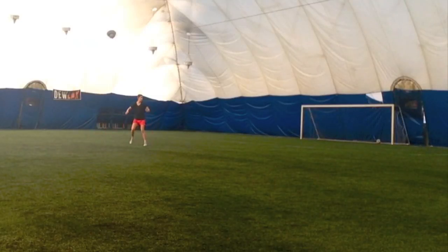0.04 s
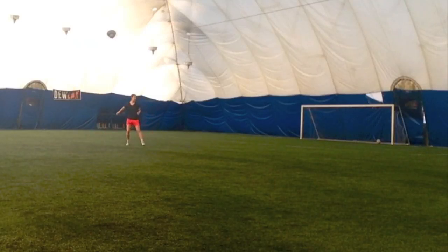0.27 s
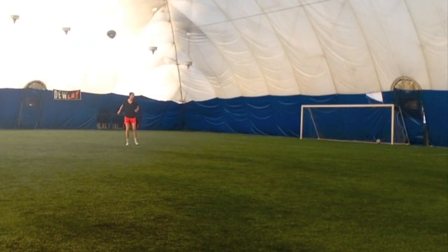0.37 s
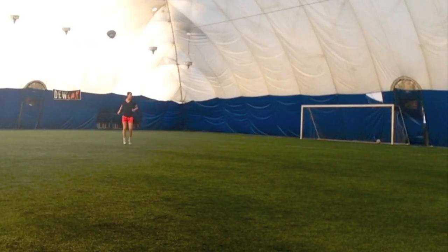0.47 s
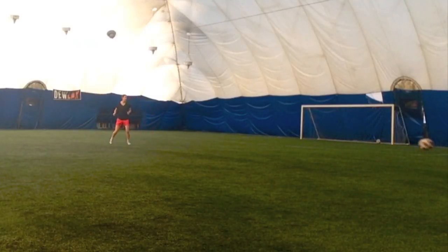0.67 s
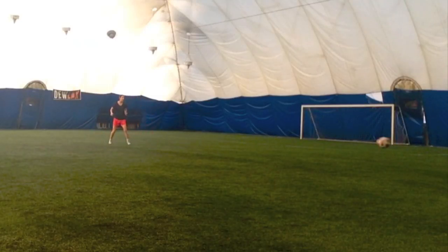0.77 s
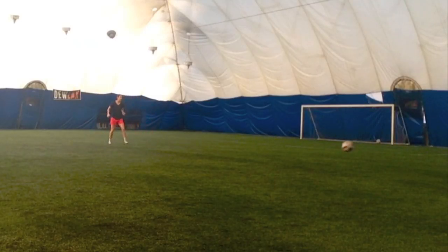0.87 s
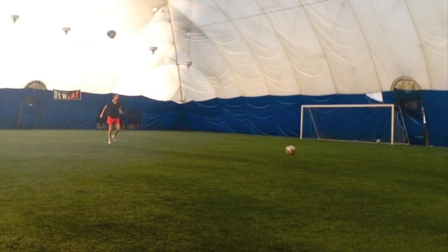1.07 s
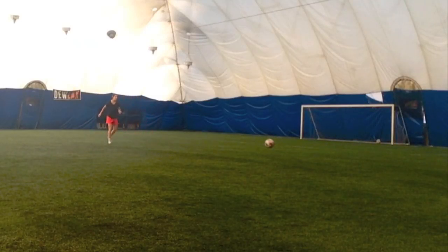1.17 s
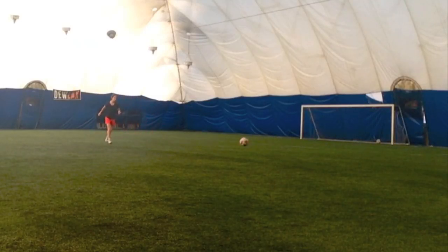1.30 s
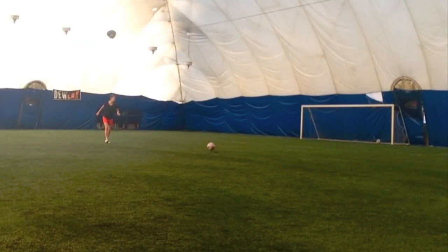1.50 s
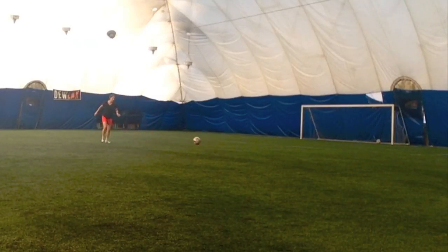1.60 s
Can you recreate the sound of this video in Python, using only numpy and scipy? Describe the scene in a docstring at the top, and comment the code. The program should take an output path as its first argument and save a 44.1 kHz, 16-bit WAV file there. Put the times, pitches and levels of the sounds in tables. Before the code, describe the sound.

Faint fan hum in a large indoor turf hall, then a sudden loud, cracking boot-on-ball thump nearby, answered a fifth of a second later by a muffled, booming echo that fades into the hum.

```python
"""Inside an air-supported sports dome, a football is kicked hard close by while blowers rumble and whine.
The boot's slap is a filtered click plus a noise burst; the thump and ping are dying cosine waves.
Turf scatter and crisp reflections follow, then roof echoes, strongest about a fifth of a second later:
copies of thump and ping, each with a dull noise burst. Fading noise makes the hall's tail, a sine with
rising pitch makes a low boom, and a swell of noise makes a late return from the far end."""
import sys
import numpy as np
from scipy import signal
from scipy.fft import rfft, irfft
from scipy.io import wavfile

SR = 44100
rng = np.random.default_rng(int(sys.argv[2]) if len(sys.argv) > 2 else 0)


def to_wav(sig):
    """Store sig (one row per channel, or 1-D mono) as 16-bit WAV at the path in sys.argv[1].

    Samples outside -1..1 are clipped; the rate is SR.
    """
    pcm = np.clip(np.atleast_2d(sig), -1, 1) * 32767
    pcm = np.round(pcm).astype(np.int16)
    wavfile.write(sys.argv[1], SR, pcm.T)  # frames by channels


N = 72765
TIME = np.arange(N) / SR   # seconds

# Rush of air from the blowers, relative colour: (f/Hz, level/dB per Hz)
BLOWER_COLOUR = [(15, -49), (25, -12), (122, -0.5), (156, -6.5), (173, -12), (274, -9.5), (322, -8.5),
                 (349, -12.5), (378, -10.5), (410, -21), (495, -18), (684, -8), (970, -19.5), (2010, -24.5),
                 (2170, -27), (2490, -28.5), (6920, -33.5), (10400, -31.5), (15500, -38)]
# Steady blower tones: (f/Hz, rms level/dB)
BLOWER_TONES = [(118.4, -68.5), (355.3, -66.5), (672.9, -75.5), (2115.7, -67)]
# Slap of the ball's skin, also used for the turf, relative colour: (f/Hz, level/dB per Hz)
SLAP_COLOUR = [(200, -28), (500, -5), (1000, -30), (2000, 0.5), (2700, 1), (4000, 3), (6500, 3.5),
               (11500, 4), (12600, -6), (13700, 3.5), (16000, -18)]
# Thump of the ball, before the push smooths it: (f/Hz, level/dB, time to fall 60 dB: t60/s)
THUMP_MODES = [(120, -9.5, 0.046), (161.7, -16, 0.065), (255, -23, 0.071), (358, -26, 0.088)]
# Ping of the ball's air and skin: (f/Hz, level/dB, t60/s)
PING_MODES = [(455.4, -37.5, 0.054), (652, -35.5, 0.092), (796, -39, 0.082), (900, -51, 0.36),
              (966, -43, .12), (1147, -42, 0.14), (1306, -34.5, 0.077), (1600, -37.5, 0.11),
              (1960, -38.5, 0.12), (2302, -40, 0.094), (3025, -67, 0.23), (3470, -35, 0.078),
              (3650, -29, 0.046), (4030, -34, 0.045)]
# Reverberation of the dome, one octave-wide band a row: (f/Hz, starting level/dB, t60/s)
HALL_BANDS = [(61.4, -47, 0.61), (116, -48, 1.4), (251, -51.5, 0.88), (510, -60, 3.9), (1000, -54.5, 2.8),
              (2000, -50.5, 0.74), (3970, -60.5, 1.15), (8400, -57, 0.81)]
# Crisp reflections of the smack from things nearby: (t/s, level/dB against the smack)
NEAR_REFLECTIONS = [(0.2616, -18.5), (.285, -24.5), (0.316, -37), (0.331, -36)]
# Echoes from the roof:
# (t/s, thump level/dB against the kick, scatter level/dB, scatter t60/s, scatter cut-off f/Hz)
ROOF_ECHOES = [(0.3434, -27.5, -56, .1, 2500), (0.416, -26, -46, 0.3, 6010), (0.427, -25, -48, 0.16, 5900),
               (0.4407, -19, -30, 0.071, 6500), (.4490, -17.5, -37.5, 0.18, 2000),
               (.4700, -34, -36, 0.089, 4900), (0.477, -18.5, -37.5, 0.2, 3054),
               (.4890, -22.5, -40, 0.089, 8770), (0.513, -34.5, -51, 0.39, 1600),
               (0.5368, -20, -43, 0.29, 900), (0.603, -37, -52, 0.26, 1240)]
# Scatter from the roof, relative colour before each echo's cut-off: (f/Hz, level/dB per Hz)
SCATTER_COLOUR = [(120, -25), (260, -8), (410, -3), (530, -9.5), (800, -8), (1500, -14), (2500, -19.5),
                  (5000, -30), (10000, -26.5), (16000, -18)]
# Late, smeared return from the far end, relative colour: (f/Hz, level/dB per Hz)
FAR_COLOUR = [(70, -10), (155, -4), (260, -14), (450, -6), (850, -1), (1400, -19), (3000, -42)]

BLOWERS_DB = -53
TONE_WAVER_DB, TONE_WAVER_HZ = 0.6, 5   # rms size and top speed of the waver
KICK_S = 0.2427
CRACK_DB, CRACK_LOW_HZ, CRACK_HIGH_HZ = 8.5, 1190, 7400   # click height before its filters
SLAP_DB, SLAP_T60_S = -17.5, 0.035
CONTACT_S = 0.0022   # length of the push that sets the ball thumping
THUMP_LOW_CUT_HZ = 73   # low cut of the microphone, which thins the thump's deepest bass
TURF_DB, TURF_T60_S = -34.5, 0.15
HALL_BUILD_S = 0.016
ECHO_RISE_S, ECHO_THUMP_CUT_HZ = 0.0019, 214
ECHO_PING_DB, ECHO_PING_CUT_HZ = 29.5, 770   # ping gain on top of each echo's scatter level
BOOM_S, BOOM_LENGTH_S, BOOM_DB = 0.62, 0.09, -47   # centre, centre to 1/e of the peak, level
BOOM_HZ, BOOM_RISE_HZ_PER_S = 141, 289.3   # pitch at the centre and how fast it climbs
BOOM_WAVER_DB, BOOM_WAVER_HZ, BOOM_WAVER_RAD = 3.5, 24.7, 0.5
FAR_S, FAR_WIDTH_S, FAR_DB = 0.686, 0.1, -51.5   # centre, centre to 1/e of the peak, level
CUTOFF_HZ = 15600


def from_db(db):
    """Turn decibels into a gain."""
    return 10 ** (np.asarray(db) / 20)


def rms_one(x):
    """Scale a sound to an rms (average strength) of 1."""
    return x / np.sqrt(np.mean(x ** 2) + 1e-20)


def filtered(x, hz, kind, order=2):
    """Keep only the low, high or band part of a sound, with a Butterworth filter."""
    sos = signal.butter(order, np.clip(hz, 2, 0.45 * SR), kind, fs=SR, output="sos")
    return signal.sosfilt(sos, x + 1e-18)


def noise(colour):
    """Random hiss shaped to the given colour, rms 1."""
    hz, db = np.transpose(colour)
    bins_hz = np.maximum(np.fft.rfftfreq(N, 1 / SR), 1)
    gain = from_db(np.interp(np.log(bins_hz), np.log(hz), db))
    return rms_one(irfft(rfft(rng.standard_normal(N)) * gain, N))


def drift(hz):
    """Random wander, mostly slower than hz, rms 1."""
    return rms_one(filtered(rng.standard_normal(N), hz, "low"))


def dying(start, t60):
    """Envelope that jumps to 1 and falls 60 dB in t60 seconds."""
    return (TIME >= start) * from_db(-60 * np.maximum(TIME - start, 0) / t60)


def rising(start, length):
    """Envelope that climbs from 0 to 1."""
    return np.clip((TIME - start) / length, 0, 1)


def swell(centre, width):
    """Bell-shaped envelope."""
    return np.exp(-((TIME - centre) / width) ** 2)


def at(x, start):
    """Place a sound at its starting time."""
    return np.concatenate([np.zeros(int(start * SR)), x])[:N]


def ring(modes, in_step):
    """Struck modes dying away from time zero, in step or each at a random phase."""
    out = 0
    for hz, db, t60 in modes:
        cycles = hz * TIME + (0 if in_step else rng.random())
        out = out + from_db(db) * dying(0, t60) * np.cos(2 * np.pi * cycles)
    return out


def blowers():
    """Steady rush of air with a few slightly wavering tones."""
    out = from_db(BLOWERS_DB) * noise(BLOWER_COLOUR)
    for hz, db in BLOWER_TONES:
        level_db = db + TONE_WAVER_DB * drift(TONE_WAVER_HZ)
        tone = np.sqrt(2) * np.sin(2 * np.pi * (hz * TIME + rng.random()))   # rms 1
        out = out + from_db(level_db) * tone
    return out


def smack():
    """First touch of the boot: one sharp crack and a brief slap of the skin."""
    click = -from_db(CRACK_DB) * (TIME == 0)
    crack = filtered(click, CRACK_HIGH_HZ, "low")
    crack = filtered(crack, CRACK_LOW_HZ, "high", order=1)
    slap = from_db(SLAP_DB) * dying(0, SLAP_T60_S) * noise(SLAP_COLOUR)
    return crack + slap


def thump():
    """The soft push of the boot sets the low modes of the ball swinging."""
    push = np.sin(np.pi * TIME[TIME < CONTACT_S] / CONTACT_S)
    modes = ring(THUMP_MODES, in_step=True)
    swing = -signal.fftconvolve(modes, push / push.sum())[:N]
    return filtered(swing, THUMP_LOW_CUT_HZ, "high")


def ball_ping():
    """The air and skin of the ball ring at many pitches, each from a random phase."""
    return ring(PING_MODES, in_step=False)


def turf():
    """Scatter from the turf: a fading noise with the colour of the slap."""
    return from_db(TURF_DB) * dying(KICK_S, TURF_T60_S) * noise(SLAP_COLOUR)


def hall():
    """Diffuse tail of the dome: octave bands of noise, each dying at its own rate."""
    tail = 0
    for hz, db, t60 in HALL_BANDS:
        edges_hz = [hz / np.sqrt(2), hz * np.sqrt(2)]
        band = rms_one(filtered(rng.standard_normal(N), edges_hz, "band"))
        tail = tail + from_db(db) * dying(KICK_S, t60) * band
    return tail * rising(KICK_S, HALL_BUILD_S)


def near_reflections(bright):
    """A few near surfaces mirror the smack as later, weaker copies."""
    return sum(from_db(db) * at(bright, start) for start, db in NEAR_REFLECTIONS)


def roof(low, ping):
    """The roof returns dulled copies of thump and ping, each with a dull burst of scattered noise."""
    low = filtered(low, ECHO_THUMP_CUT_HZ, "low")
    ping = from_db(ECHO_PING_DB) * filtered(ping, ECHO_PING_CUT_HZ, "low")
    out = 0
    for start, thump_db, scatter_db, t60, cut_hz in ROOF_ECHOES:
        scatter = filtered(noise(SCATTER_COLOUR), cut_hz, "low", order=1)
        scatter = scatter * rising(start, ECHO_RISE_S) * dying(start, t60)
        out = out + from_db(thump_db) * at(low, start)
        out = out + from_db(scatter_db) * (scatter + at(ping, start))
    return out


def boom():
    """A low boom held by the dome: one sine that swells and fades as its pitch creeps up."""
    pitch_hz = BOOM_HZ + BOOM_RISE_HZ_PER_S * (TIME - BOOM_S)
    phase = 2 * np.pi * np.cumsum(pitch_hz) / SR
    level_db = BOOM_DB + BOOM_WAVER_DB * drift(BOOM_WAVER_HZ)
    wave = np.sin(phase + BOOM_WAVER_RAD * drift(BOOM_WAVER_HZ))
    return from_db(level_db) * swell(BOOM_S, BOOM_LENGTH_S) * wave


def far_end():
    """The late return from the far end, smeared into a swell of noise."""
    return from_db(FAR_DB) * swell(FAR_S, FAR_WIDTH_S) * noise(FAR_COLOUR)


def scene():
    """The blowers, the kick and everything the dome sends back, in mono."""
    bright, low, ping = smack(), thump(), ball_ping()
    kick = at(bright + low + ping, KICK_S)
    nearby = turf() + near_reflections(bright)
    dome = hall() + roof(low, ping) + boom() + far_end()
    return (blowers() + kick + nearby + dome)[None]


def record(dry):
    """Cut the very top of the sound steeply."""
    sos = signal.ellip(10, 0.1, 80, CUTOFF_HZ, fs=SR, output="sos")   # 0.1 dB ripple, 80 dB cut
    return signal.sosfilt(sos, dry)


dry = scene()
out = record(dry)
to_wav(out)
```